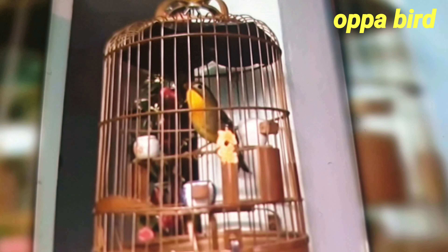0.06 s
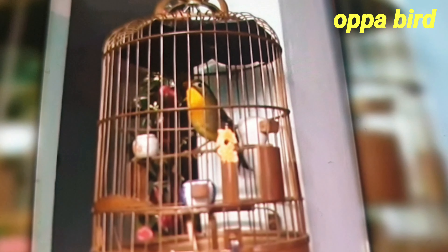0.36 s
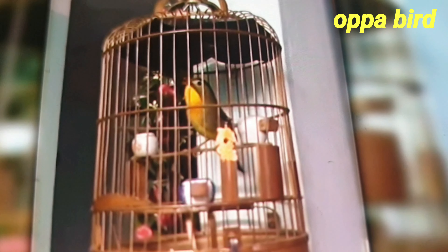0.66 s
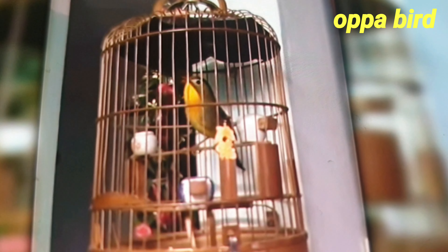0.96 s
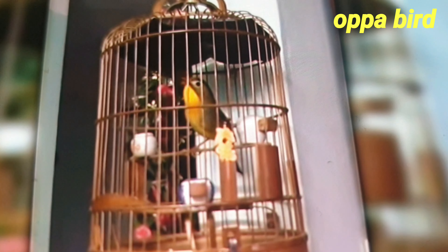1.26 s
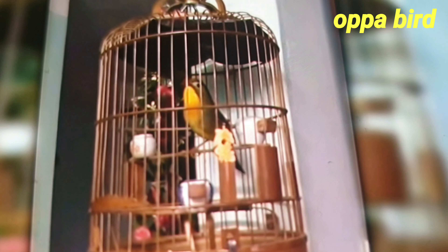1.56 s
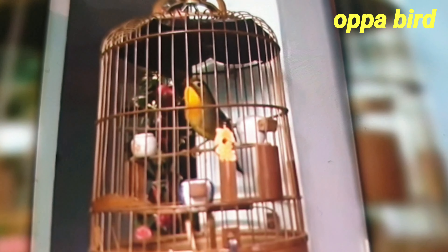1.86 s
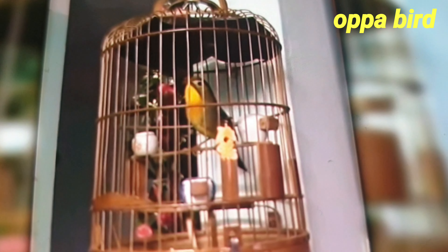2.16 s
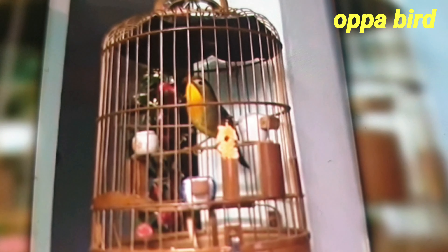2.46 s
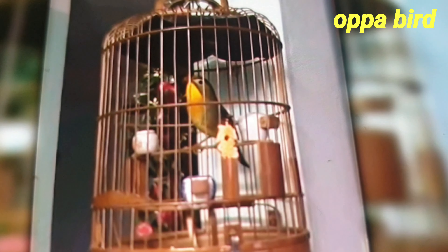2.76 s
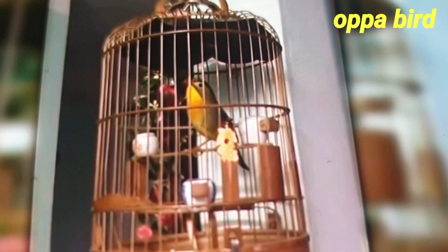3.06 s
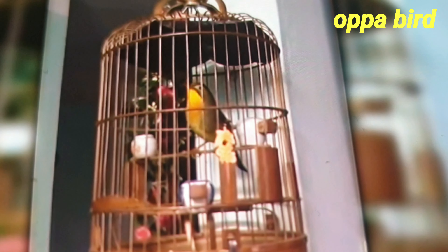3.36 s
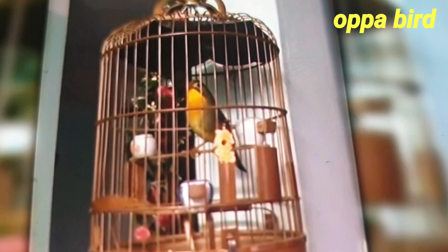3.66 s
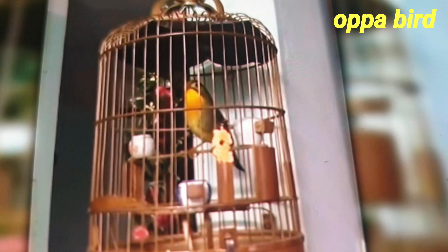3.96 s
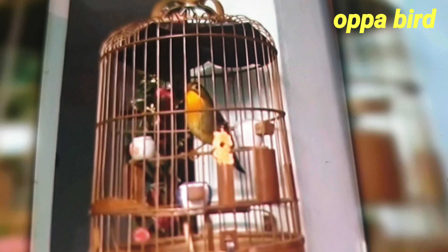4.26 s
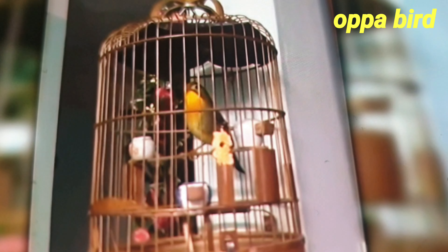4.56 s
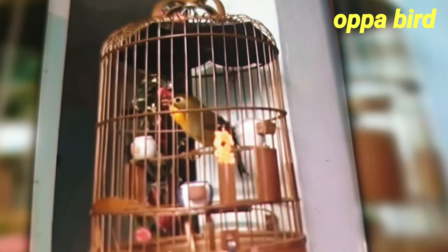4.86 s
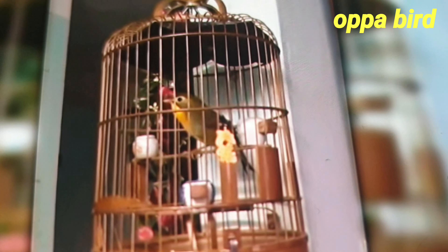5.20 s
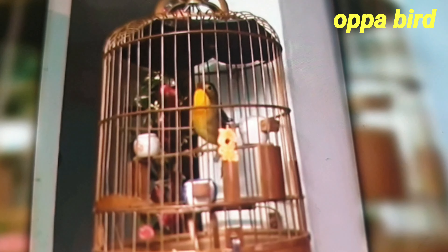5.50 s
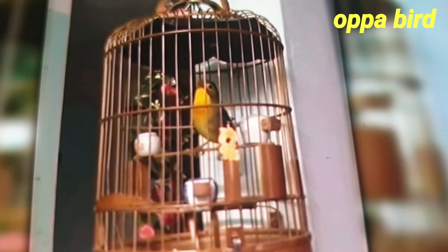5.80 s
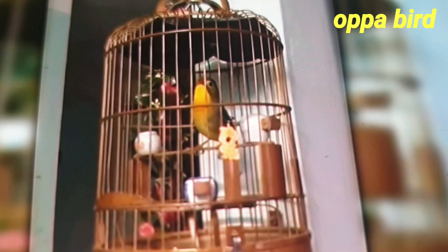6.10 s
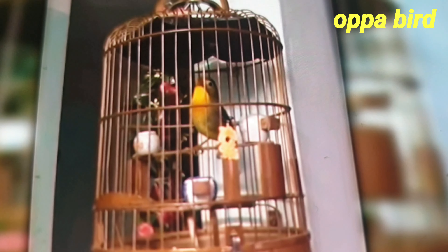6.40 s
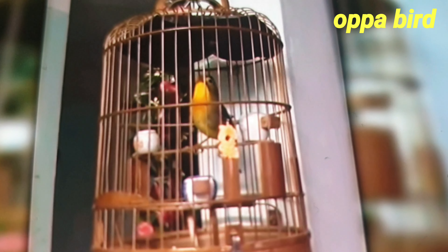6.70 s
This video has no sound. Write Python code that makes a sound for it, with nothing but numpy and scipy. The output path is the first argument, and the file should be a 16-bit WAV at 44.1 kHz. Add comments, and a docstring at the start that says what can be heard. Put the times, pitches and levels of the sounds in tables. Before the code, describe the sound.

Close, rapid whistles and warbles from a songbird on a porch, pausing once while a farther bird calls thinly over a faint hum.

```python
"""On a porch, a caged songbird close to a stereo microphone sings two quick fluty phrases: pure slurs and
fast warbles, each a gliding near-sine with faint overtones, ringing between the walls. A faint hoot sounds
under the end of the first phrase. In the pause come soft rustles and four thin calls from a bird farther
off. A low hum runs underneath. The microphone distorts a little on loud notes, and its body shades left
or right by pitch."""
import sys
import numpy as np
from scipy import signal
from scipy.fft import rfft, irfft, next_fast_len
from scipy.io import wavfile
from scipy.ndimage import uniform_filter1d, minimum_filter1d

SR = 44100
rng = np.random.default_rng(int(sys.argv[2]) if len(sys.argv) > 2 else 0)


def transcribe(u):
    """Save the signal u as a 16-bit wav file named by the first command-line argument.

    u: samples, shape (n,) or (channels, n), limited to [-1, 1]; the rate is SR.
    q: integer samples, one column per channel.
    """
    v = np.clip(np.atleast_2d(u).T, -1, 1)
    q = np.round(v * 32767).astype(np.int16)
    wavfile.write(sys.argv[1], SR, q)


N = 306054

# The low rumble under everything. Each row: frequency in Hz, relative spectral level in dB.
RUMBLE_SPECTRUM = [(12, -35.5), (20, -14), (48, -4), (71, 1.5), (108, -6), (136, -6), (201, -12.5),
                   (229, -16), (266, -20.5), (387, -26.5), (427, -27.5), (622, -28.5), (1000, -37.5),
                   (1300, -62.5), (2200, -120)]
# Its slow swell, lowest in the pause. Each row: time in seconds, level in dB.
RUMBLE_SWELL = [(0.0, -53), (0.7, -52), (1.25, -49), (1.7, -55.5), (2.15, -50.5), (2.75, -57),
                (3.65, -51.5), (4.5, -54.5), (5.35, -52.5), (6.3, -48.5), (6.9, -51.5)]
# Hum tones in the rumble. Each row: frequency in Hz, level in dB.
HUM_TONES = [(59.5, -70.5), (81, -67.5), (237, -71)]
# Faint hiss. Each row: frequency in Hz, relative spectral level in dB.
HISS_SPECTRUM = [(300, -30), (900, -7), (2300, -7), (4100, -14), (6000, -19), (8500, -22), (10500, -16.5),
                 (13000, -12.5), (15300, -22.5)]
# How alike noise is in left and right. Each row: frequency in Hz, correlation (clipped to 0-1 in use).
STEREO_LIKENESS = [(60, 0.92), (150, 0.54), (380, 0.8), (940, -2.8), (2360, -0.65), (5920, 1),
                   (14800, 0.35)]
# Two notes already over, still ringing at the opening.
# Each row: start in seconds before the opening, length in seconds, pitch in Hz, level in dB.
RINGING_NOTES = [(0.107, .07, 1641, -19), (0.122, 0.043, 2585, -20)]
# The ring of the porch. Each row: frequency in Hz, seconds to die away by 60 dB.
PORCH_DECAY = [(500, 0.17), (1500, 0.3), (2700, 0.45), (4000, 0.5), (8000, 0.33), (14000, 0.26)]
# The near bird's pure slurs; each note rings in the porch by its own amount.
# Each row: start and length in seconds, entry, held and exit pitch in Hz, level in dB,
# crest (loudest point, 0-1 along the note), room send in dB.
SLURRED_NOTES = [ (0.107, 0.066, 2156, 2593, 1974, -16, 0.78, 3),
                 (0.268, 0.046, 2138, 2834, 3170, -7.5, 0.4, -5.5),
                 (0.653, .034, 2880, 2967, 2312, -9, .75, -3),
                 (1.014, .115, 3606, 2455, 2438, -15.5, .15, 1.5),
                 (1.126, .036, 2438, 2472, 2033, -15, .7, 2),
                 (1.17, 0.075, 2165, 2825, 2965, -5.5, 0.1, -4),
                 (1.464, .058, 2026, 2265, 2000, -17.5, 0.6, 0),
                 (1.551, .075, 3540, 2561, 2615, -7.5, 0.2, -2.5),
                 (1.689, .041, 2095, 2370, 2576, -15.5, 0.4, -3.5),
                 (1.718, .120, 2378, 2496, 2640, -9, .58, -1.5),
                 (1.973, .053, 2833, 2812, 2440, -4.5, .42, -5),
                 (2.385, .112, 2730, 2723, 2819, -3, 0.4, -7.5),
                 (2.596, 0.089, 3090, 2580, 2555, -10, 0.53, -4),
                 (2.697, 0.064, 2554, 2143, 1493, -25.5, 0.2, 2.5),
                 (5.825, .056, 2541, 2728, 2957, -10.5, 0.8, -0.5),
                 (5.942, 0.033, 1449, 1600, 2000, -29.5, 1, 3),
                 (5.965, 0.096, 1993, 2387, 2450, -23.5, 0.1, 3.5),
                 (6.152, 0.028, 2680, 2660, 2350, -15.5, .6, -4.5),
                 (6.194, 0.062, 2705, 3383, 3012, -8, 0.2, -4.5),
                 (6.408, 0.041, 2690, 3023, 2756, -9.5, .95, -4.5),
                 (6.724, 0.024, 1525, 1390, 1596, -31, 0.8, 0),
                 (6.847, 0.02, 3750, 3460, 2550, -17.5, 1, -8.5),
                 (6.855, .099, 2770, 3181, 2937, -5.5, 0.3, -3)]
# Its fluttering notes. Each row: as for a slur, then warble depth in Hz, warbles per second.
WARBLED_NOTES = [ (0.173, 0.037, 2742, 3248, 3168, -12.5, 0.6, 2, 220.3, 60),
                 (0.298, .079, 3164, 2754, 2664, -11, 0.3, 0, 258.2, 100),
                 (0.522, .033, 3530, 3476, 1896, -22.5, 0.9, -0.5, 321, 92),
                 (0.541, .092, 2431, 2173, 2640, -18.5, 0.8, 1, 129.2, 100),
                 (0.678, .057, 3028, 3404, 3354, -9, 0.4, -4.5, 247, 61),
                 (0.86, 0.035, 1656, 2200, 2784, -34, 1, 3, 80, 72),
                 (0.89, .088, 2837, 2742, 1785, -14.5, 0.1, -0.5, 204.1, 54),
                 (1.276, .034, 3136, 3170, 2466, -19, 0.3, 1, 317.3, 48),
                 (1.324, .100, 1714, 2056, 2327, -30.5, .45, 7, 315.3, 48),
                 (1.664, .036, 2780, 1944, 2204, -25, 0.7, -1.5, 190, 99),
                 (1.943, .040, 2716, 2814, 2850, -11, 0.9, -3.5, 130, 94),
                 (2.021, .089, 2384, 2382, 2570, -19, .35, 0, 325, 97),
                 (2.206, .023, 3334, 3633, 3300, -18, 0.7, -4.5, 408, 75),
                 (2.223, 0.035, 2866, 3277, 2855, -10, .4, -2.5, 313.8, 87),
                 (2.278, .044, 2450, 2169, 1973, -20.5, 0.4, -4.5, 89.3, 95),
                 (2.352, 0.063, 2195, 2668, 2716, -7.5, 0.4, -9.5, 130, 51),
                 (5.329, 0.026, 2763, 2505, 2225, -31, .8, -2, 100, 83),
                 (5.351, 0.035, 2244, 2221, 2546, -21.5, 1, -1, 150, 83),
                 (5.381, .076, 2305, 2860, 2980, -9, 0.5, -0.5, 124.3, 83),
                 (5.447, .036, 2898, 3343, 3276, -17.5, 0, -1.5, 405, 83),
                 (5.878, .067, 2689, 2740, 2447, -9.5, 0, -1, 185, 63),
                 (6.177, 0.038, 2362, 2716, 3240, -8, 1, -5, 205, 126),
                 (6.446, .028, 2934, 2802, 1983, -6.5, 0.3, -1, 60.3, 91),
                 (6.458, .092, 2014, 2599, 2108, -22, 1, 2, 156, 103),
                 (6.547, .034, 1929, 2377, 3350, -17, 0.7, -1.5, 182, 103),
                 (6.578, 0.027, 3188, 2833, 2017, -13, 1, 0, 130, 103),
                 (6.618, .036, 2164, 2413, 2845, -17.5, 0.3, -7, 152.5, 78),
                 (6.743, .078, 1826, 1750, 1705, -25, .65, 1, 242.7, 38)]
# Overtones of the whistle. Each row: multiple of the pitch, level in dB before colouring.
WHISTLE_OVERTONES = [(2, -44), (3, -48.5), (4, -55.5), (5, -49.5), (6, -48)]
# How throat and beak colour the overtones and air noise. Each row: frequency in Hz, gain in dB.
BEAK_RESPONSE = [(3500, 12.5), (4400, -1), (5000, -12.5), (5700, -6), (6400, -2.5), (7000, -0.5),
                 (7700, -11), (8400, -4.5), (9500, -7.5), (11200, -6.5), (12400, 7.5), (13800, 5),
                 (15200, -11)]
# Brightness through the song. Each row: time in seconds, gain of overtones and air noise in dB.
SONG_BRIGHTNESS = [(0.2, 2.5), (0.7, -1), (1.1, 2), (1.7, 1.5), (2.4, -1.5), (2.7, 1), (5.4, -1),
                   (6.2, -2.5), (6.55, 6), (6.9, -4.5)]
# Echoes off the nearest walls. Each row: delay in seconds, relative gain.
WALL_ECHOES = [(.0016, 0.41), (.0052, 0.25), (.009, 0.17), (0.012, .09), (0.0236, .11), (.025, 0.074)]
# A faint hoot in the distance. Each row: start and length in seconds, pitch in Hz, level in dB.
FAR_HOOTS = [(2.48, 0.13, 442, -69)]
# The far bird: a high pip that drops to a long quavering note.
# Each row: start and length in seconds, pip, held and exit pitch in Hz, level in dB.
FAR_BIRD_CALLS = [ (3.15, 0.17, 3480, 3150, 3088, -52), (3.404, 0.36, 3510, 3038, 3235, -48),
                  (3.804, .270, 3460, 3012, 3180, -46), (4.167, 0.23, 3430, 3022, 3137, -45)]
# Its soft low notes. Each row: start and length in seconds, pitch in Hz, level in dB.
FAR_LOW_NOTES = [(3.218, .06, 1544, -63), (3.629, .064, 1560, -66), (3.928, .07, 1535, -62),
                 (4.31, .05, 1580, -60)]
# Soft rustles. Each row: start and length in seconds, level in dB.
RUSTLE_STROKES = [(2.941, 0.1, -59.5), (4.64, 0.1, -50), (4.949, 0.081, -73)]
# Their dull colour. Each row: frequency in Hz, relative spectral level in dB.
RUSTLE_SPECTRUM = [(210, -31), (350, 0), (448, -35), (477, -3), (629, 4), (911, -11.5), (1200, 5.5),
                   (1300, 1.5), (1740, -13), (2770, -6), (3230, -3.5), (3540, -20), (3830, -17),
                   (8410, -50.5), (14000, -12.5)]
# Colour of the microphone's slight distortion. Each row: frequency in Hz, gain in dB.
DISTORTION_COLOUR = [(3000, -62.5), (3900, -13), (5500, -21.5), (6900, -38.5), (7600, -23), (8500, -25),
                     (9500, -32.5), (11200, -22.5), (11800, -4), (14300, -8), (15200, -12.5)]
# The right microphone port against the left. Each row: frequency in Hz, level in dB, phase in radians.
RIGHT_PORT = [(1100, 0, 0.0), (1520, 10, -3.0), (1750, 7, -4.0), (1920, 17, -5.2), (2080, 3, -6.1),
              (2400, -1, -6.6), (2650, -6, -7.4), (2860, -15, -7.3), (3020, -9, -6.9), (3400, -5, -9.0),
              (3850, -16, -8.6), (4950, 4, -14.7), (6000, -11, -19.0), (7050, 1, -22.1), (8300, -11, -26.9),
              (13000, -9, -40.9)]

# Note shapes: time constant of the slide to the held pitch, lateness of the final bend,
# swell up to the crest, fade after it, and how broad the crest is.
SLUR_SHAPE = dict(settle_s=0.0098, bend=2.8, rise_db=15, fall_db=15.0, roundness=1.61)
WARBLE_SHAPE = dict(settle_s=0.0098, bend=3, rise_db=9.5, fall_db=12.5, roundness=1.5)
FAR_SHAPE = dict(settle_s=0.015, bend=0.45, rise_db=7.5, fall_db=9.5, roundness=4.4)
SLUR_ATTACK_S, WARBLE_ATTACK_S, RELEASE_S = 0.0079, 0.0042, 0.007


def gain_of(db):
    """Decibels to gain."""
    return 10 ** (np.asarray(db) / 20)


def unit_rms(x):
    """Scales a signal to rms 1."""
    return x / np.sqrt(np.mean(x ** 2) + 1e-20)


def curve_at(points, hz):
    """Reads a table on a log-frequency axis."""
    table_hz, value = np.transpose(points)
    return np.interp(np.log(hz + 1), np.log(table_hz + 1), value)


def add(mix, start, sound):
    """Mixes a sound in at a start time in seconds."""
    part = mix[..., max(round(start * SR), 0):][..., :sound.shape[-1]]
    part += sound[..., :part.shape[-1]]


def excerpt(x, start, count):
    """Takes count samples from a start time in seconds, wrapping at the end."""
    return x[(round(start * SR) + np.arange(count)) % N]


def drift(rate_hz):
    """A smooth random wander of rms 1, mostly slower than rate_hz."""
    hz = np.fft.rfftfreq(N, 1 / SR)
    return unit_rms(irfft(rfft(rng.standard_normal(N)) / (1 + (hz / rate_hz) ** 4), N))


def stereo_noise(spectrum):
    """Noise of rms 1 with a given spectrum, its left and right more or less alike by frequency."""
    size = next_fast_len(N, True)
    hz = np.fft.rfftfreq(size, 1 / SR)
    left, unrelated = rfft(rng.standard_normal((2, size)))
    likeness = np.clip(curve_at(STEREO_LIKENESS, hz), 0, 1)
    right = likeness * left + np.sqrt(1 - likeness ** 2) * unrelated
    return unit_rms(irfft(np.array([left, right]) * gain_of(curve_at(spectrum, hz)), size)[:, :N])


def background_hum(swell_db=1.27, waver_rad=0.9, hiss_db=-68.0, lean_left_db=0.48):
    """The bed of the place: a slowly swelling rumble, wavering hum tones and faint hiss."""
    t = np.arange(N) / SR
    rumble_db = np.interp(t, *np.transpose(RUMBLE_SWELL)) + swell_db * drift(rate_hz=5)
    rumble = gain_of(rumble_db) * stereo_noise(RUMBLE_SPECTRUM)
    hum = sum(np.sqrt(2) * gain_of(db) * np.sin(2 * np.pi * hz * t + waver_rad * drift(rate_hz=26))
              for hz, db in HUM_TONES)
    hiss = gain_of(hiss_db) * stereo_noise(HISS_SPECTRUM)
    return (rumble + hum + hiss) * gain_of([[lean_left_db], [-lean_left_db]])


def steady_note(length, hz, db):
    """A note on one pitch, loudest in the middle."""
    return length, hz, hz, hz, db, 0.5


def contour(note, settle_s, bend, rise_db, fall_db, roundness):
    """Pitch and level of a note: it slides onto a held pitch and bends away, swelling and fading."""
    length, entry_hz, held_hz, exit_hz, db, crest = note
    t = np.arange(0, length, 1 / SR)
    progress, crest = t / length, np.clip(crest, 0.02, 0.98)
    pitch = held_hz + (entry_hz - held_hz) * np.exp(-t / settle_s) + (exit_hz - held_hz) * progress ** bend
    before = np.maximum(1 - progress / crest, 0)
    after = np.maximum((progress - crest) / (1 - crest), 0)
    return pitch, db - rise_db * before ** roundness - fall_db * after ** roundness


def whistle(start, note, shape, tremor, depth_hz=0, warble_hz=0, stumble=0.093, widen=0.88, rasp_rad=0.31):
    """One bird note, a near-sine that glides and may warble. Returns fundamental and overtones."""
    pitch, level_db = contour(note, **shape)
    t = np.arange(len(pitch)) / SR
    shake = excerpt(tremor, start, len(t))
    flutter_hz = warble_hz * (1 + stumble * unit_rms(shake))
    flutter = np.sin(2 * np.pi * np.cumsum(flutter_hz) / SR)
    swing_hz = depth_hz * (1 + widen * (t / t[-1] - 0.5))
    hz = (pitch + swing_hz * flutter) * (1 + shake)
    phase = 2 * np.pi * np.cumsum(hz) / SR
    attack_s = WARBLE_ATTACK_S if depth_hz else SLUR_ATTACK_S
    ramp = np.clip(np.minimum(t / attack_s, (t[-1] - t) / RELEASE_S), 0, 1)
    envelope = np.sqrt(2) * gain_of(level_db) * np.sin(np.pi / 2 * ramp) ** 2
    # Below the throat's resonance the fundamental radiates poorly: overtones gain 15 dB an octave.
    low_boost_db = 15 * np.maximum(np.log2(2700 / pitch), 0)
    # Warbles vibrate unevenly, which smears the overtones into a rasp and lifts them up to 3 dB.
    strain = np.clip(depth_hz / 250, 0, 1)
    rough_phase = phase + rasp_rad * strain * unit_rms(shake)
    overtones = np.zeros(len(t))
    for multiple, db in WHISTLE_OVERTONES:
        gain = gain_of(db + low_boost_db + 3 * strain + curve_at(BEAK_RESPONSE, multiple * hz))
        overtones += gain * (multiple * hz < SR / 2) * np.sin(multiple * rough_phase)
    return envelope * np.sin(phase), envelope * overtones


def porch_ring(x, gap_s=0.0038, early_boost=2.0, early_s=0.037):
    """Dense reflections in the porch: a strong first cluster, then a tail that dies band by band."""
    count, slot = 1800, 20  # one reflection in every 20 samples
    taps = np.zeros(count * slot)
    taps[np.arange(count) * slot + rng.integers(0, slot, count)] = rng.choice([-1., 1.], count)
    hz, frame_s, bands = signal.stft(taps, SR, nperseg=256)
    decay = gain_of(-60 * frame_s / curve_at(PORCH_DECAY, hz)[:, None])
    tail = signal.istft(bands * decay, SR, nperseg=256)[1]
    t = np.arange(len(tail)) / SR
    onset = np.clip(t / gap_s - 0.5, 0, 1)
    response = tail * onset * np.sqrt(1 + early_boost * np.exp(-t / early_s))
    return signal.fftconvolve(x, response / np.linalg.norm(response))[:N]


def lingering_ring():
    """The porch still rings with two notes sung just before the opening."""
    voice, no_tremor = np.zeros((2, N))
    for ago, *note in RINGING_NOTES:
        tone, _ = whistle(0, steady_note(*note), WARBLE_SHAPE, no_tremor, depth_hz=120, warble_hz=54.6)
        add(voice, 1 - ago, tone)  # within a one-second lead-in, dropped below
    return np.pad(porch_ring(voice)[SR:], (0, SR))


def caged_songbird(slur_jitter=0.0045, warble_jitter=0.0097, slur_air_db=-57.5, warble_air_db=-51.0,
                   walls_db=-10.5, porch_db=-3.5, overtone_ring_db=5.5):
    """The bird close to the microphone: direct song with a trace of air noise, wall echoes and ring."""
    direct, room_tone, room_sheen = np.zeros((3, N))
    tremor, air = drift(rate_hz=700), stereo_noise(BEAK_RESPONSE)[0]
    slurs = [(start, room_db, slur_air_db, whistle(start, note, SLUR_SHAPE, slur_jitter * tremor))
             for start, *note, room_db in SLURRED_NOTES]
    warbles = [(start, room_db, warble_air_db,
                whistle(start, note, WARBLE_SHAPE, warble_jitter * tremor, depth_hz, warble_hz))
               for start, *note, room_db, depth_hz, warble_hz in WARBLED_NOTES]
    for start, room_db, air_db, (tone, overtones) in slurs + warbles:
        breath = gain_of(air_db) * abs(tone) * excerpt(air, start, len(tone))
        brightness_db = np.interp(start, *np.transpose(SONG_BRIGHTNESS))
        sheen = gain_of(brightness_db) * (overtones + breath)
        add(direct, start, tone + sheen)
        add(room_tone, start, gain_of(room_db) * tone)
        add(room_sheen, start, gain_of(room_db) * sheen)
    ring = porch_ring(room_tone + gain_of(overtone_ring_db) * room_sheen)
    return direct + gain_of(walls_db) * wall_echoes(room_tone) + gain_of(porch_db) * ring


def wall_echoes(x):
    """Single echoes off the nearest surfaces; they beat against every glide."""
    echoes = np.zeros(N)
    for delay_s, gain in WALL_ECHOES:
        add(echoes, delay_s, gain * x)
    return echoes


def far_calls(pip_s=0.056, pip_boost_db=2.5, crest=0.042, jitter=0.017, direct_db=-2.5, porch_db=3.0):
    """Farther off: a hoot, then thin falling calls and their low notes, heard largely by reflection."""
    voice, tremor = np.zeros(N), jitter * drift(rate_hz=150)
    for start, length, pip_hz, held_hz, exit_hz, db in FAR_BIRD_CALLS:
        pip = steady_note(pip_s, pip_hz, db + pip_boost_db)
        add(voice, start, whistle(start, pip, FAR_SHAPE, tremor)[0])
        drop_s = start + pip_s - RELEASE_S
        held = (length - pip_s, held_hz, held_hz, exit_hz, db, crest)
        add(voice, drop_s, whistle(drop_s, held, FAR_SHAPE, tremor, depth_hz=43.7, warble_hz=58.36)[0])
    for start, *note in FAR_LOW_NOTES + FAR_HOOTS:
        add(voice, start, whistle(start, steady_note(*note), FAR_SHAPE, tremor)[0])
    return gain_of(direct_db) * voice + gain_of(porch_db) * porch_ring(voice)


def rustles():
    """Short dull swishes of noise, reaching the microphone only as the porch's ring."""
    t = np.arange(N) / SR
    envelope = np.zeros(N)
    for start, length, db in RUSTLE_STROKES:
        progress = np.clip((t - start) / length, 0, 1)
        envelope += gain_of(db) * np.sqrt(np.sin(np.pi * progress).clip(0))
    return porch_ring(envelope * stereo_noise(RUSTLE_SPECTRUM)[0])


def microphone_distortion(x):
    """The microphone bends loud sound: odd overtones on pure notes, a sizzle where echoes tangle."""
    size = next_fast_len(N, True)
    colour = gain_of(curve_at(DISTORTION_COLOUR, np.fft.rfftfreq(size, 1 / SR)))
    return x + irfft(rfft(x * abs(x), size) * colour, size)[:N]


def microphone_ports(x):
    """Sound reaches the right port later, and the body shades one port or the other by pitch."""
    size = next_fast_len(N + SR // 10, True)
    hz = np.fft.rfftfreq(size, 1 / SR)
    table_hz, db, phase = np.transpose(RIGHT_PORT)
    right_db, right_phase = np.interp(hz, table_hz, db), np.interp(hz, table_hz, phase)
    left = gain_of(-np.maximum(right_db, 0))
    right = gain_of(np.minimum(right_db, 0)) * np.exp(1j * right_phase)
    return irfft(rfft(x, size) * np.array([left, right]), size)[:, :N]


def scene():
    """The porch from the microphone's position: birds and rustles over the hum."""
    sources = caged_songbird() + lingering_ring() + far_calls() + rustles()
    return microphone_ports(microphone_distortion(sources)) + background_hum()


def record(dry, ceiling=0.93, cutoff_hz=15450):
    """A quick limiter holds the loudest notes under full scale; a low-pass trims the top."""
    needed_gain = np.minimum(1, ceiling / (abs(dry).max(axis=0) + 1e-9))
    smooth_gain = uniform_filter1d(minimum_filter1d(needed_gain, size=400), size=300)
    lowpass = signal.firwin(511, cutoff_hz, window=("kaiser", 9), fs=SR)
    return signal.oaconvolve(dry * smooth_gain, lowpass[None], "same")


dry = scene()
out = record(dry)
transcribe(out)
```